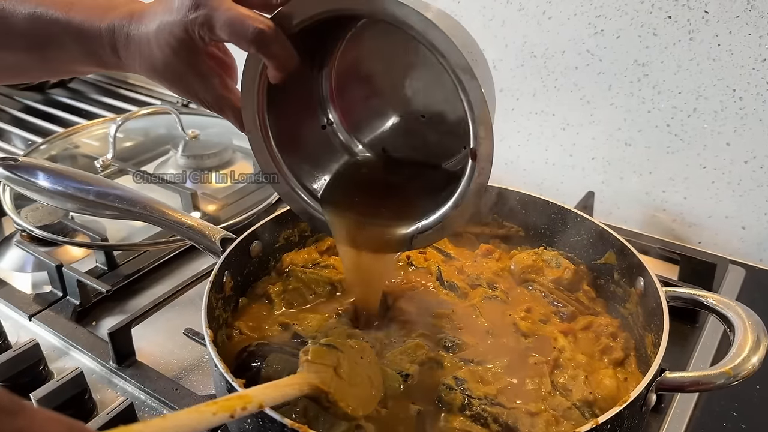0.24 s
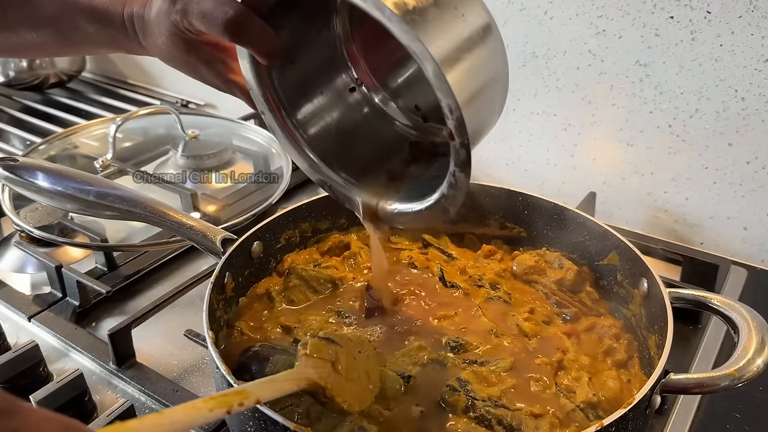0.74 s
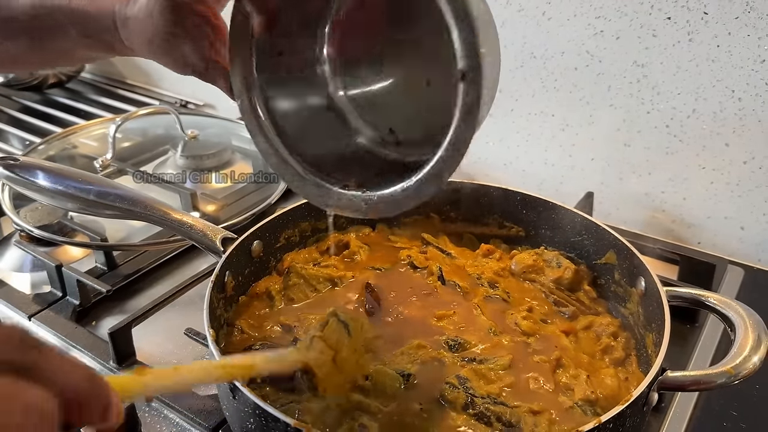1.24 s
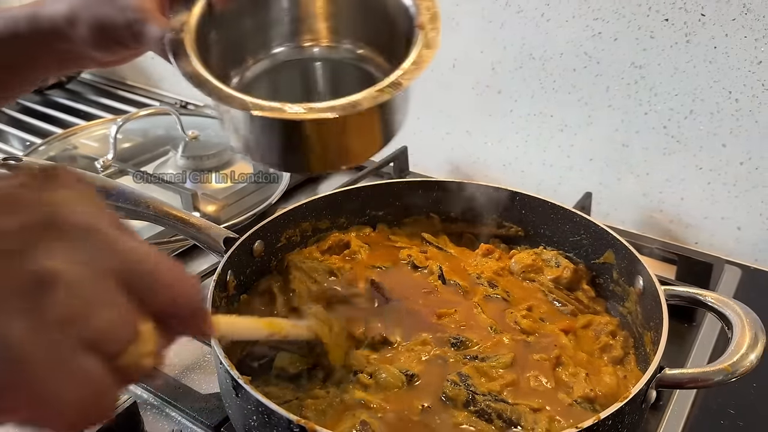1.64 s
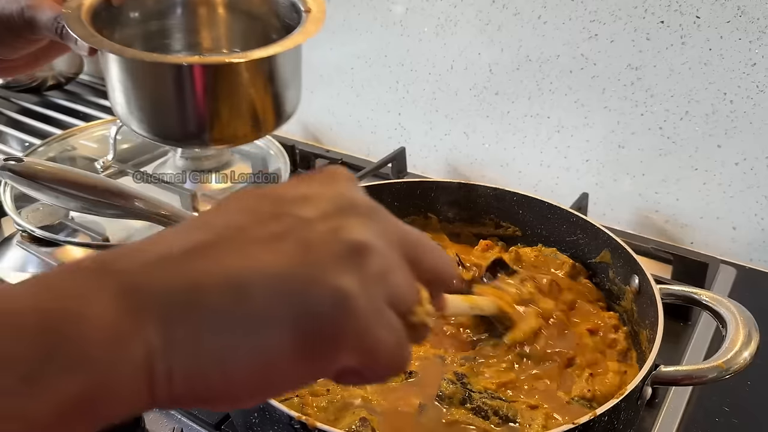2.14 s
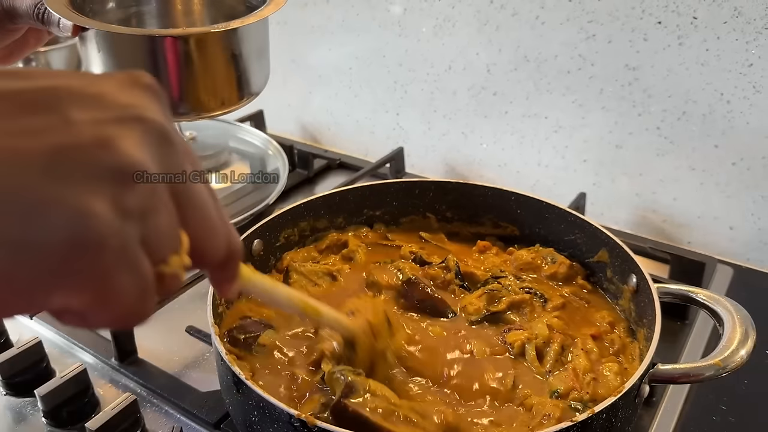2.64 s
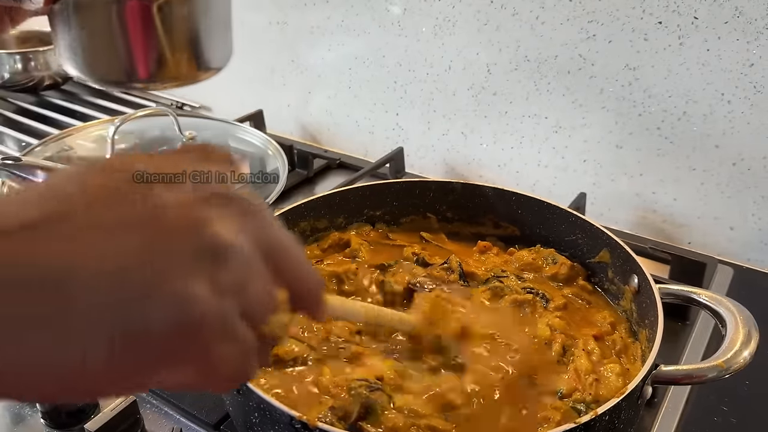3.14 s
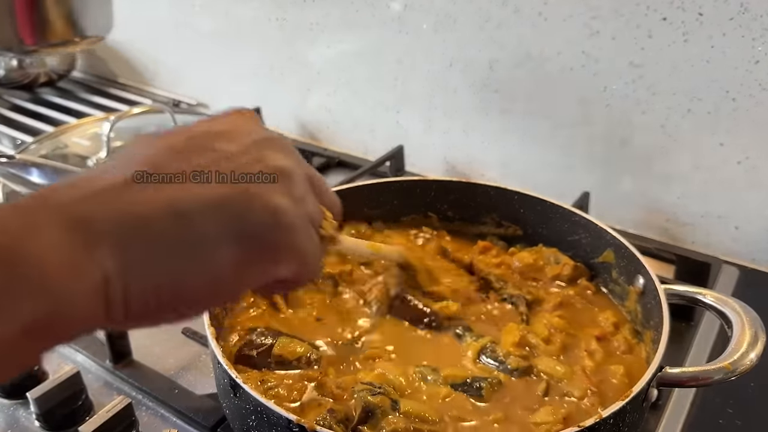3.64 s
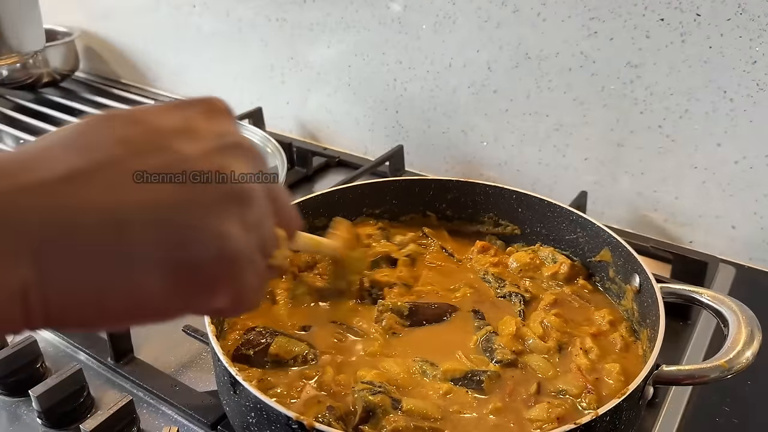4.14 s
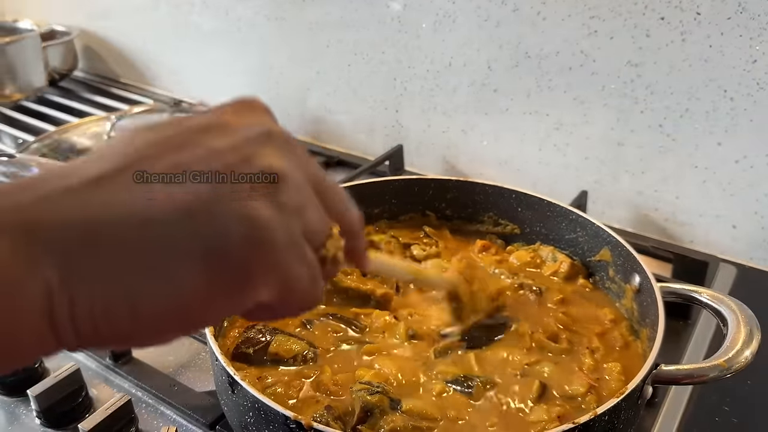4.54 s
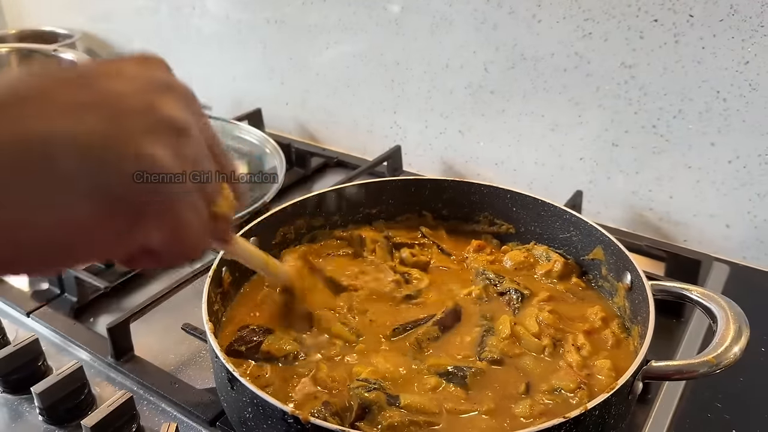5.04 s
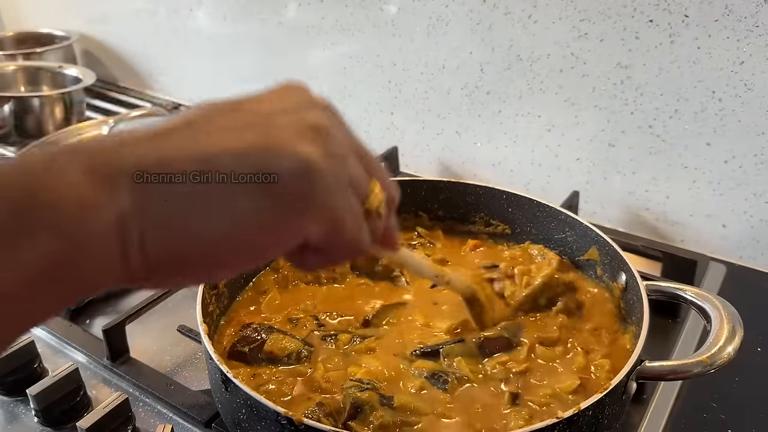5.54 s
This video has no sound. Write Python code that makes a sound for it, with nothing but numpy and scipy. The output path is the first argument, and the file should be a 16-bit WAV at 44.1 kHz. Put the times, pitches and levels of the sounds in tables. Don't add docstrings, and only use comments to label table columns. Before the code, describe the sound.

In a home kitchen, a thin stream of liquid trickles into a pan of thick stew, close to the microphone, with bubbly plinks and crisp snaps. The pour thins out after a second, leaving soft spoon rubs, small wet pops and light splashes. A gas burner hisses and a fan hums steadily throughout. Near the end a steel bowl clatters onto other metalware a little further away, ringing briefly in the room.

```python
import sys
import numpy as np
from scipy import signal
from scipy.fft import rfft, irfft
from scipy.io import wavfile
from scipy.ndimage import uniform_filter1d

SR = 44100
rng = np.random.default_rng(int(sys.argv[2]) if len(sys.argv) > 2 else 0)


def master_out(mix):
    frames = np.transpose(np.atleast_2d(mix))
    ceiling = np.clip(frames, -1, 1)
    pcm = np.round(ceiling * 32767).astype(np.int16)
    wavfile.write(sys.argv[1], SR, pcm)


def rack_gain(trim_db):
    fader = np.asarray(trim_db, float)
    return 10 ** (fader / 20)


N = 255780


def evened(x):
    return x / np.sqrt(np.mean(x ** 2) + 1e-20)


def read(points, hz):
    f, value = np.transpose(points)
    return np.interp(np.log(hz + 1), np.log(f + 1), value)


def add(mix, start_s, sound):
    part = mix[round(start_s * SR):][:len(sound)]
    part += sound[:len(part)]


def coloured(x, points):
    hz = np.fft.rfftfreq(len(x), 1 / SR)
    return irfft(rfft(x) * rack_gain(read(points, hz)), len(x))


def resonate(x, hz, width):
    turn = np.exp(2j * np.pi * hz * np.arange(len(x)) / SR)
    r = np.exp(-np.pi * width / SR)
    two_poles = np.convolve([1, -r], [1, -r])
    return (turn * signal.lfilter([1], two_poles, x / turn)).real


def drift(top_hz):
    t = np.arange(0, N + 400, 200) / SR
    rates = np.geomspace(.3, top_hz, num=16)
    slow = sum(np.sin(2 * np.pi * (f * t + rng.random())) / np.sqrt(f) for f in rates)
    return np.interp(np.arange(N) / SR, t, evened(slow))


def hood():
    # (frequency [Hz], rms level [dB], waver [dB])
    tones = [(99.8, -40.5, -0.54), (196.7, -67.5, 2), (234.4, -56.5, 6.5), (299.6, -43, -0.47),
             (330, -51, 6.5), (396.5, -59.5, 2.5), (418, -59.5, 12.5), (427, -61, -5), (705, -60.5, -6.5)]
    t = np.arange(N) / SR
    out = np.zeros(N)
    for hz, db, waver in tones:
        level = db + min(waver, 1.5) * drift(top_hz=6)
        out += np.sqrt(2) * rack_gain(level) * np.sin(2 * np.pi * (hz * t + rng.random()))
    return out


def burner():
    # (frequency [Hz], density [dB per Hz])
    outline = [(30, -25), (50, -7.5), (70, 1), (330, -4), (450, -7), (1300, -9), (2200, -15), (3300, -21),
               (6000, -18.5), (8000, -19.5), (10000, -24), (12500, -19.5), (14300, -28), (16000, -25)]
    # (frequency [Hz], width [Hz], lift [dB])
    peaks = [(619, 30, 3.2), (788, 14, 9), (987, 69, 4.8), (1716, 108, 8.3), (1885, 137, 10.4),
             (2380, 50, 1.9), (2910, 67, 1), (4600, 550, 6.5), (7226, 280, 12), (8510, 390, 7.1),
             (9100, 380, 3.7), (9900, 67, 1.3), (11700, 170, 6.4), (13600, 400, 2)]
    frames = N // 256 + 5
    a, b, patches = rng.standard_normal((frames, 513, 3)).T
    patches = uniform_filter1d(patches, size=14, axis=0)
    patches = evened(uniform_filter1d(patches, size=12, axis=1))
    grid = (a + 1j * b) * rack_gain(1.24 * patches)
    hiss = signal.istft(grid, nperseg=1024, noverlap=768)[1][:N]
    hz = np.fft.rfftfreq(N, 1 / SR)
    shape_db = read(outline, hz)
    for centre, width, db in peaks:
        shape_db = shape_db + db * np.exp(-.5 * ((hz - centre) / (width / 2)) ** 2)
    rush = evened(irfft(rfft(hiss) * rack_gain(shape_db), N))
    return rack_gain(-39 + 0.13 * drift(top_hz=1.2)) * rush


def kitchen(x):
    # (frequency [Hz], t60 [s])
    decay = [(150, 0.87), (500, 0.66), (2000, 0.45), (5000, 0.51), (10000, 0.29), (16000, .25)]
    taps = np.zeros(SR)
    at = np.arange(200, SR - 20, 20)
    taps[at + rng.integers(0, 20, at.shape)] = rng.choice([-1., 1.], at.shape)
    hz, t, z = signal.stft(taps, SR, nperseg=256)
    t60 = read(decay, hz)[:, None]
    tail = signal.istft(z * rack_gain(-60 * t / t60), SR, nperseg=256)[1]
    return signal.fftconvolve(x, tail / np.linalg.norm(tail))[:N]


def spoon():
    # (time [s], length [s], centre [Hz], width [Hz])
    drags = [(1.93, .19, 260, 180), (1.94, .17, 750, 600), (2.36, .12, 200, 120), (3.07, .1, 550, 1000),
             (3.1, .06, 170, 60), (5.16, .07, 560, 600), (5.15, .1, 230, 150), (2.94, .34, 8800, 3500),
             (2.92, .27, 11500, 5000), (3.17, .06, 9600, 120), (3.125, .025, 9600, 120),
             (3.035, .06, 9900, 300), (5.66, .13, 200, 100)]
    press = [-38.5, -42, -41.5, -40, -43, -32, -45, -44.5, -46, -43, -53, -52, -41]
    out = np.zeros(N)
    for db, (s, length, hz, width) in zip(press, drags):
        n = round(length * SR)
        rub, lumps = rng.standard_normal((2, n))
        lumps = rack_gain(2.2 * evened(uniform_filter1d(lumps, size=300)))
        rub = evened(resonate(rub, hz, width) * lumps)
        add(out, s, rack_gain(db) * rub * signal.windows.tukey(n, .5))
    return out


def bowl():
    # (time [s], blow [dB], struck-spot mode [Hz], extra level there [dB])
    blows = [
        (5.535, -4, 1300, 8),
        (5.539, 1, 2320, 9),
        (5.543, -12.5, 720, 16),
        (5.555, -4.5, 2290, 1),
        (5.563, -2, 2290, -14),
        (5.573, -12, 6500, 1),
        (5.596, -9.5, 3300, 4),
        (5.611, -12, 900, 12),
    ]
    steel_hz = [388, 480, 687, 760, 813, 956, 1090, 1250, 1459, 1782, 2161, 2269, 2320, 2895, 3362, 3553,
                4300, 4716, 5060, 5351, 5560, 6548, 6993, 7720, 8075, 8440, 9938, 11330]
    # (level [dB], t60 [s])
    steel = [(-2.5, 0.19), (-6.5, 0.49), (-7, 0.9), (-1, 0.29), (0, 0.25), (-1, 0.17), (-12, 0.36),
             (-14, 0.34), (-15, 0.83), (-7, .45), (-13, .5), (4.5, 0.17), (0.5, 0.23), (4, 0.39),
             (4.5, 0.17), (-14, 0.27), (-11, .3), (-27, 0.46), (-20, 0.51), (-0.5, .4), (-19, .3),
             (-8, 0.55), (-12, .4), (-6, .3), (-8, 0.2), (-9, 0.34), (-14, .2), (-5, .17)]
    # (frequency [Hz], density [dB per Hz])
    rattle = [(71, -47), (120, -9), (392, -1.5), (533, -9.5), (785, -1), (1160, -10), (1810, -1),
              (2010, -8), (2320, -23), (2670, -7.5), (15800, -16)]
    held = 0.51
    t = np.arange(SR // 3) / SR
    out = np.zeros(N)
    hz = np.array(steel_hz)[:, None]
    db, t60 = np.transpose(steel)[:, :, None]
    waves = rack_gain(db) * np.sin(2 * np.pi * (hz * t + rng.random(hz.shape) / 2))
    long_ring = rack_gain(-60 * t / (held * t60))
    sharp_ring = rack_gain(-60 * t / 0.054)
    onset = 1 - np.exp(-t * 2000)
    for s, blow_db, spot_hz, extra_db in blows:
        near = rack_gain(extra_db) * np.exp(-(np.log(hz / spot_hz) / 0.22) ** 2)
        ring = (waves * (long_ring + near * sharp_ring)).sum(axis=0)
        shake = rng.standard_normal(len(t))
        rough = np.zeros(len(t))
        for mode_hz, (mode_db, _) in zip(steel_hz[::2], steel[::2]):
            rough += rack_gain(mode_db) * evened(resonate(shake, mode_hz, 140.0))
        crowd = (evened(coloured(shake, rattle)) + 0.25 * evened(rough)) * rack_gain(-60 * t / .12)
        add(out, s, rack_gain(blow_db) * (rack_gain(-25) * ring + rack_gain(-15) * crowd) * onset)
    return out


def fizz():
    # (time [s], level [dB])
    stream = [(0, -38), (.15, -42.5), (.3, -42), (.5, -38.5), (.6, -43), (.72, -47), (.78, -38.5),
              (.86, -40.5), (.95, -45), (1.2, -52), (1.5, -49), (1.8, -48), (2.4, -50.5), (2.47, -45),
              (2.56, -41)]
    # (time [s], level [dB])
    settled = [(2.64, -68), (3.55, -68), (3.65, -59), (3.75, -66), (5.8, -68)]
    # (frequency [Hz], density [dB per Hz])
    spectrum = [(500, 12), (1500, 7.5), (3200, 9.5), (5500, -1), (8000, -2), (10000, -9), (13000, -1),
                (16000, -3.5)]
    out = np.zeros(N)
    for hz in np.geomspace(700, 15500, num=26):
        where, chance = rng.random((N // 500 + int(hz) // 8, 2)).T
        size = np.zeros(N)
        size[(where * N).astype(int)] = rack_gain(3 * np.minimum(-np.log(chance), 3))
        turns = np.arange(SR // 60) * hz / SR
        cycles = 2.0 + hz / 8000
        grain = np.sin(2 * np.pi * turns * (1 + 0.0034 * turns)) * turns * np.exp(-turns / cycles)
        bubbles = signal.oaconvolve(size, grain / np.linalg.norm(grain))[:N]
        out += rack_gain(read(spectrum, hz)) * np.sqrt(hz) * bubbles
    drops = rng.random(N) < 70 / SR
    landing = signal.lfilter([1], [1, -np.exp(-1 / (0.0056 * SR))], drops)
    level_db = np.interp(np.arange(N) / SR, *np.transpose(stream + settled))
    return rack_gain(level_db) * evened(out * (0.83 + landing))


def pop(db, hz, t60, noisy, width):
    t = np.arange(round(.06 * SR)) / SR
    tone = np.sin(2 * np.pi * hz * t * (1 + 3.7 * t)) * (1 - np.exp(-t / (0.072 * t60)))
    film = rng.standard_normal(len(t))
    click = np.diff(film, prepend=0) * np.exp(-t / 0.00045)
    crack = evened(resonate(film, hz, width * hz)) + 0.35 * click
    noisy = np.clip(noisy, 0, 1)
    return rack_gain(db - 60 * t / max(t60, .002)) * (1.99 * (1 - noisy) * tone + 0.96 * noisy * crack)


def stew():
    # (time [s], peak level [dB], centre [Hz])
    snaps = [(0.0643, -38, 15500), (0.0777, -40, 12100), (0.1035, -29, 11900), (0.1211, -30, 13500),
             (0.1622, -23, 12800), (0.22, -29, 11700), (0.2828, -42, 11900), (0.2834, -28, 11700),
             (0.3257, -35, 13000), (0.3384, -21.5, 13500), (0.3676, -34, 12800), (0.4579, -41, 9500),
             (0.458, -28, 12400), (0.4913, -31, 12800), (0.5716, -20, 13800), (0.6714, -28, 14400),
             (0.7093, -28, 12100), (0.7463, -24, 12600), (0.7563, -23, 12500), (0.778, -16.5, 14400),
             (0.8026, -29, 12200), (0.835, -18, 11500), (0.9358, -30, 14700), (0.9482, -28, 12500),
             (0.9916, -32, 12100), (1.0191, -29, 12100), (1.0814, -34, 13600), (1.1942, -29, 12000),
             (1.2286, -37, 11800), (1.2999, -31, 12900), (1.3488, -38, 12700), (1.3678, -30, 12400),
             (1.4092, -31, 14600), (1.4711, -32, 13600), (1.535, -29, 12900), (1.5483, -23, 12700),
             (1.6392, -34, 12600), (2.0682, -33, 11900), (2.0956, -36, 11900), (2.2403, -32, 11600),
             (2.4533, -40, 12900), (2.4867, -31, 12800), (2.5646, -36, 11500), (2.858, -23, 14200),
             (2.9313, -28, 11800), (3.18, -34, 9630), (3.3079, -52, 11900), (3.4176, -36, 11700),
             (3.491, -30, 11900), (3.711, -35, 13100), (3.7334, -32, 11600), (3.7758, -25, 12900),
             (3.7956, -24, 12900), (3.8174, -28, 13500), (3.8372, -28, 13100), (3.8566, -30, 13100),
             (3.8765, -26, 13600), (3.8955, -30, 12200), (3.9145, -27, 12700), (3.936, -32, 14200),
             (3.9568, -28.5, 12400), (4.13, -36, 11500), (4.1699, -27, 12100), (4.2926, -35, 11400),
             (4.3525, -35, 12800), (4.3994, -36, 12200), (4.4393, -31, 14000), (4.4533, -36, 12300),
             (4.5037, -39, 11700), (4.6568, -35, 11600), (4.6732, -34, 12200), (4.7441, -34, 12900),
             (4.8693, -31, 11700), (5.1277, -29, 12300), (5.249, -28.5, 13300)]
    # (time [s], peak level [dB], centre [Hz], t60 [s])
    smacks = [(0.0987, -36, 7100, 0.0088), (0.161, -35, 7230, 0.008), (0.3257, -25, 8380, 0.008),
              (0.4, -18.5, 6150, 0.0095), (0.4865, -28, 6150, 0.008), (0.5746, -32, 7200, 0.0087),
              (0.7458, -24, 7300, 0.008), (0.776, -18, 7600, 0.0093), (0.834, -24, 8150, 0.012),
              (1.6995, -35, 7110, 0.008), (1.8362, -31, 8360, 0.008), (2.8574, -39, 7250, 0.008),
              (3.4456, -29, 6080, 0.008), (3.7753, -37, 7290, 0.008), (3.7948, -37, 7140, 0.008),
              (3.934, -30, 7180, 0.008), (4.0692, -33, 7240, 0.008), (4.1694, -31, 6900, 0.008),
              (4.2812, -30.5, 7700, 0.0089), (4.3994, -35, 7150, 0.008), (5.1282, -25, 7560, 0.0097)]
    # (time [s], peak level [dB], centre [Hz], t60 [s])
    ticks = [(.078, -29, 800, .02), (.111, -30, 4600, .01), (.276, -27, 13500, .01), (.312, -29, 5200, .01),
             (.339, -27, 4500, .012), (.408, -27, 8800, .01), (.47, -30, 12500, .01), (.55, -30, 4600, .01),
             (.585, -31, 5600, .008), (1.096, -33, 14000, .008), (1.563, -30, 13000, .008),
             (2.548, -31, 4800, .01), (3.283, -35, 15400, .01), (3.612, -29, 4200, .008),
             (3.62, -28, 3800, .01), (3.65, -32, 3800, .008), (3.666, -31, 3500, .01),
             (4.003, -30, 4500, .008), (4.165, -29, 5200, .008), (4.552, -33, 3000, .008)]
    # (time [s], peak level [dB], pitch [Hz], t60 [s], noisiness [0-1])
    bubbles = [(0.078, -18, 4960, 0.011, 0.2), (0.1195, -42, 2180, 0.015, 0.6),
               (0.1201, -21, 3200, 0.014, 0.56), (0.159, -27, 5340, 0.015, 0.3),
               (0.178, -29, 2560, 0.015, 0.4), (0.2022, -26, 2780, 0.014, 0.3),
               (0.2214, -28, 3320, 0.017, 0.8), (0.2573, -34, 2800, 0.014, 0.5),
               (0.299, -26, 3300, 0.015, 0.64), (0.3272, -14.5, 4380, 0.014, 0.22),
               (0.3676, -22, 3460, 0.015, 0.4), (0.3993, -31, 2720, 0.015, 0.4),
               (0.4315, -21.5, 2150, 0.015, 0.43), (0.461, -21, 2730, 0.017, 0.37),
               (0.4848, -26, 4980, 0.024, 0.4), (0.5746, -30, 2700, 0.02, 0.5),
               (0.6639, -31, 4910, 0.015, 0.3), (0.6923, -35, 4960, 0.017, 0.3),
               (0.7546, -37, 3020, 0.015, 0.6), (0.7561, -23, 2240, 0.018, 0.6),
               (0.7761, -30, 6550, 0.015, 0.4), (0.79, -20, 4740, 0.02, 0.14),
               (0.8178, -22.5, 2600, 0.019, 0.46), (0.8395, -22, 2240, 0.015, 0.7),
               (0.876, -24.5, 4040, 0.023, 0.44), (1.062, -51, 2200, 0.013, 0.4),
               (1.1238, -32, 4700, 0.015, 0.7), (1.19, -32, 5090, 0.025, 0.4),
               (1.233, -29.5, 2970, 0.022, 0.5), (1.4646, -29, 4500, 0.016, 0.56),
               (1.4945, -33, 3880, 0.015, 0.5), (1.5878, -33, 3690, 0.025, 0.6),
               (1.6751, -30, 4770, 0.018, 0.5), (2.1056, -32, 5300, 0.015, 0.35),
               (2.456, -34, 3330, 0.019, 0.5), (2.5007, -31, 3050, 0.016, 0.22),
               (2.8584, -26.5, 2860, 0.014, 0.85), (2.902, -32, 4650, 0.013, 0.6),
               (3.256, -37, 4830, 0.015, 0.8), (3.3084, -31, 5700, 0.013, 0.7),
               (3.4186, -25, 4780, 0.019, 0.3), (3.4456, -39, 6080, 0.015, 0.06),
               (3.604, -17, 3600, 0.0061, 0.23), (3.6825, -29, 4450, 0.013, 0.7),
               (3.7758, -30, 5100, 0.013, 0.5), (3.796, -30, 5300, 0.012, 0.4),
               (3.817, -27, 5350, 0.0094, 0.4), (3.8372, -40, 4740, 0.013, 0.5),
               (3.8767, -31, 4630, 0.015, 0.6), (3.9958, -26.5, 3520, 0.018, 0.6),
               (4.1696, -33, 4400, 0.015, 0.9), (4.17, -20, 2510, 0.018, 0.75),
               (4.2245, -29, 2900, 0.018, 0.8), (4.2306, -24, 2800, 0.013, 0.64),
               (4.3904, -38, 5430, 0.015, 0.4), (4.4403, -36, 4800, 0.015, 0.3),
               (4.5453, -27, 2250, 0.016, 0.9), (4.657, -36, 3610, 0.015, 0.5),
               (4.6728, -28, 2900, 0.012, 0.7), (5.129, -26, 2380, 0.012, 1)]
    # (time [s], peak level [dB], pitch [Hz], t60 [s], noisiness [0-1])
    plops = [(0.162, -24, 700, 0.02, 0.5), (0.257, -24.5, 1780, 0.024, 0.5), (0.431, -26, 2090, 0.03, 0.15),
             (0.498, -26, 1770, 0.03, 0.5), (0.573, -31, 1820, 0.03, 0.2), (0.756, -28, 1990, 0.024, 0.2),
             (0.84, -25, 1420, 0.041, 0.5), (2.857, -33, 1840, 0.03, 0.4), (3.288, -30, 1140, 0.03, 0.3),
             (4.545, -34, 1860, 0.024, 0.5), (5.128, -25, 1336, 0.055, 0.5)]
    splash_s = [.159, .49, .495, .573, .838, 2.452, 2.857, 3.604, 5.13]
    # (t60 [s], level [dB], centre [Hz], width [Hz])
    splashes = [
        (0.067, -29, 1200, 1500),
        (.1, -36, 13000, 5000),
        (.1, -32, 4400, 5000),
        (.07, -36, 3000, 4000),
        (.06, -31, 5000, 7500),
        (0.24, -37, 3700, 3000),
        (.02, -32.5, 3300, 6400),
        (0.24, -37.5, 4300, 3400),
        (0.11, -34, 4500, 6800),
    ]
    out = np.zeros(N)
    for s, db, hz in snaps:
        t60 = .008 * rack_gain(.25 * (db + 28))
        add(out, s, pop(db, hz, t60, .85, width=.33))
    for s, db, hz, t60 in smacks + ticks:
        add(out, s, pop(db, hz, t60, 0.72, width=0.24))
    for s, db, hz, t60, noisy in bubbles + plops:
        add(out, s, pop(db, hz, t60, noisy, width=1.0))
    t = np.arange(SR // 5) / SR
    for s, (t60, db, hz, width) in zip(splash_s, splashes):
        spray, lumps = rng.standard_normal((2, len(t)))
        lumps = evened(rack_gain(4 * evened(uniform_filter1d(lumps, size=80))))
        add(out, s, rack_gain(db - 60 * t / t60) * lumps * evened(resonate(spray, hz, width)))
    return out


def scene():
    pan = stew() + fizz() + spoon()
    far = bowl()
    room = kitchen(rack_gain(-10.5) * pan + rack_gain(-1.5) * far)
    return (hood() + burner() + pan + far + room)[None]


def top_cut(x):
    return signal.sosfilt(signal.butter(12, 17010, fs=SR, output="sos"), x)


def record(dry):
    bass_cut = signal.butter(4, 52, "high", fs=SR, output="sos")
    edge = signal.firwin(511, 15780, window=("kaiser", 5), fs=SR)
    thin = signal.sosfilt(bass_cut, dry)
    return top_cut(signal.oaconvolve(thin, edge[None], "same"))


dry = scene()
out = record(dry)
master_out(out)
```